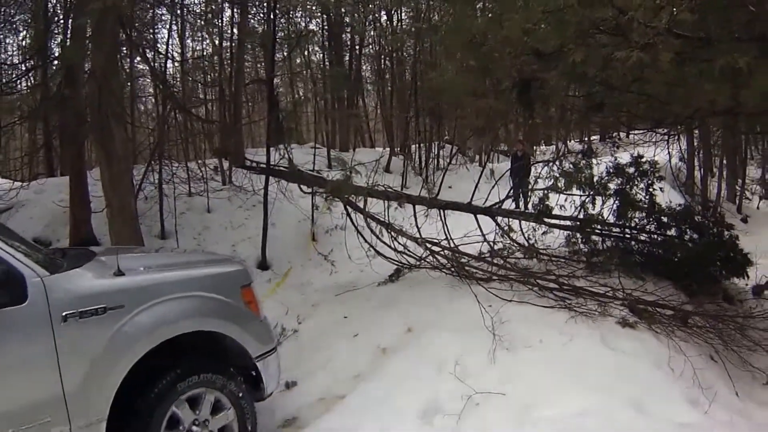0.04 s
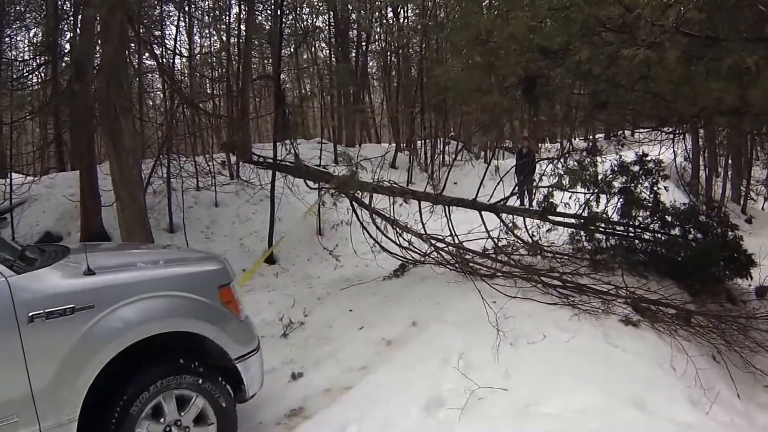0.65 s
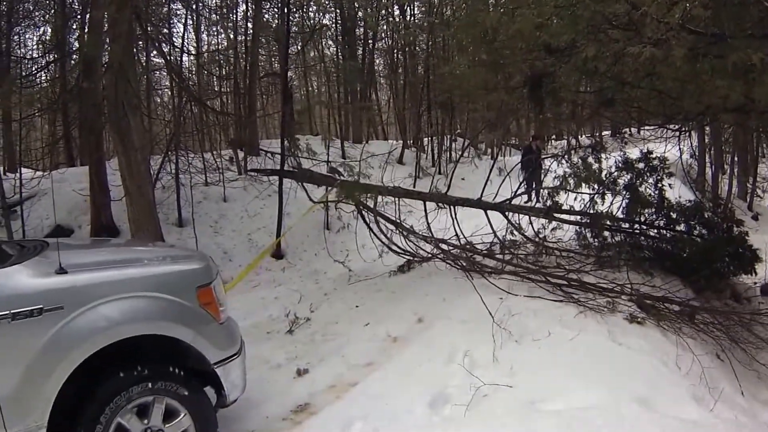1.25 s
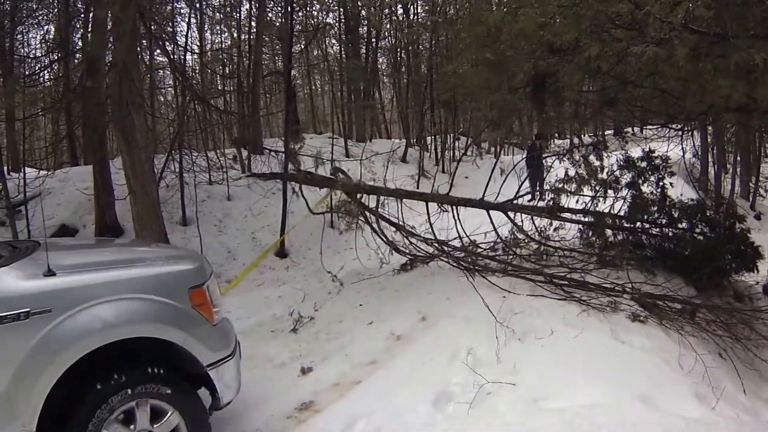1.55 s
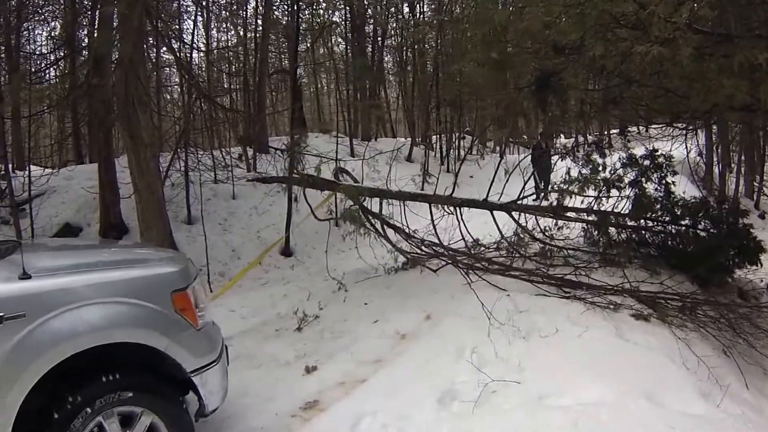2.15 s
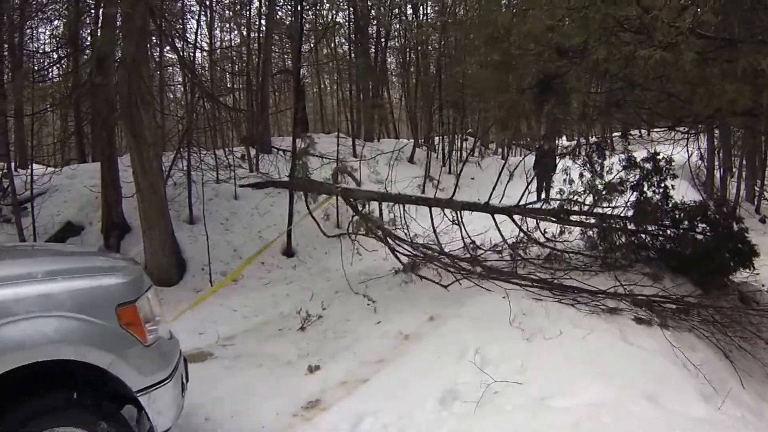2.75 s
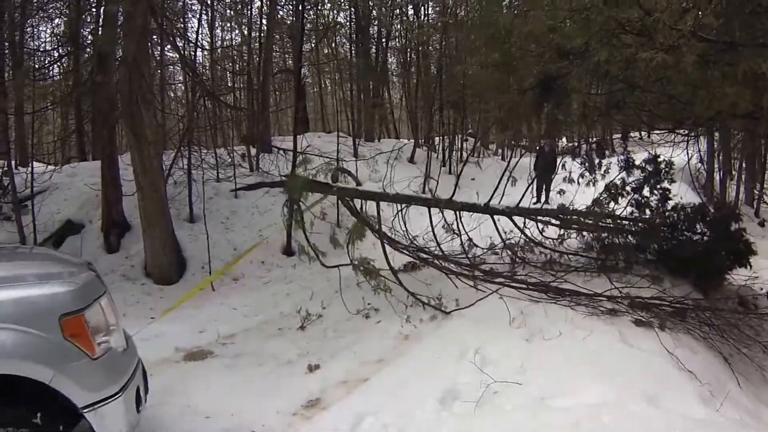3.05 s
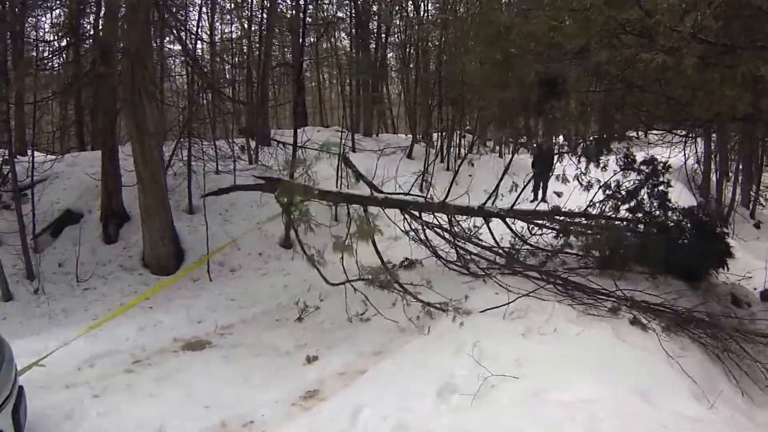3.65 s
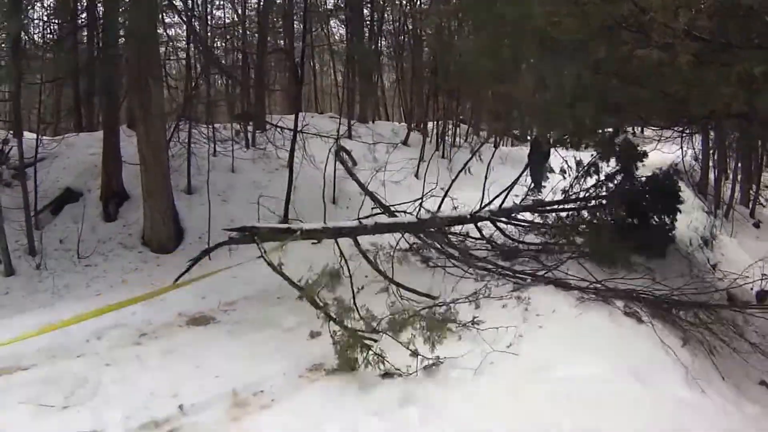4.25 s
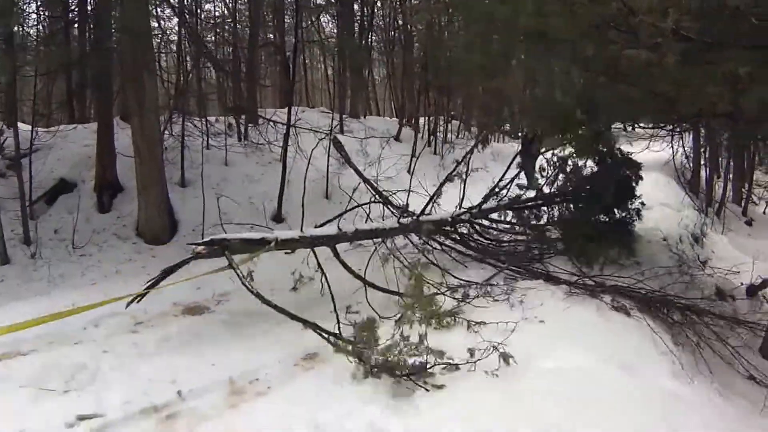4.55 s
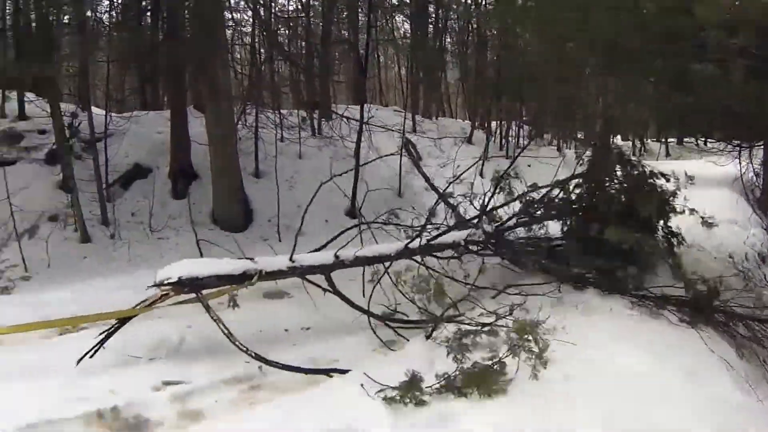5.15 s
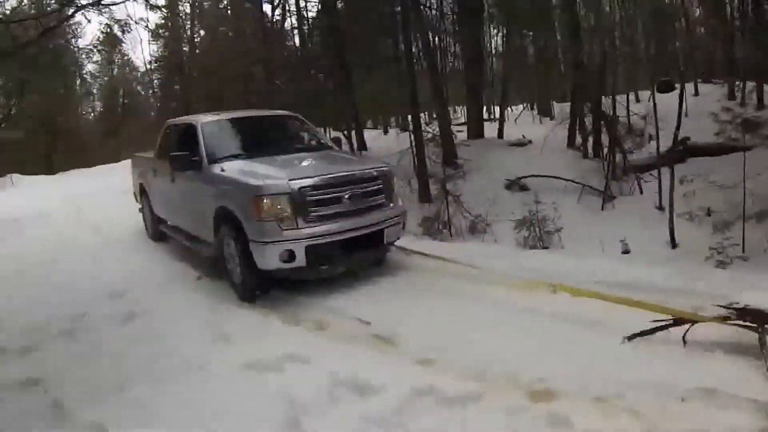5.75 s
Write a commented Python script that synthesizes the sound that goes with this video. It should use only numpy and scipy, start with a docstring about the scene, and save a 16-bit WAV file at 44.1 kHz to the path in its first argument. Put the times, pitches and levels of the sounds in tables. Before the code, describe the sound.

In snowy woods, light wind buffets a small microphone over a low truck engine and dull tyre thuds. The engine picks up and the snow crunches louder as a fallen tree is dragged along. Past halfway, a branch snaps hard enough to overload the microphone, then another, each with a short echo and splintering crackle. The engine drops back while twigs scrape and lighter branches keep cracking.

```python
"""An engine burbles and tyres crunch and thud: a pickup creeps backwards over packed snow,
towing a fallen tree out of the woods on a strap. Bent branches snap one after another, and the
trunks around scatter every crack. Twigs sweep the snow. Light wind rumbles on a small microphone
that the loudest snaps overload."""
import sys
import numpy as np
from scipy import signal
from scipy.fft import rfft, irfft, next_fast_len
from scipy.io import wavfile
from scipy.ndimage import uniform_filter1d

SR = 44100
rng = np.random.default_rng(int(sys.argv[2]) if len(sys.argv) > 2 else 0)


def put_to_file(sound):
    """Save the sound as 16-bit audio at rate SR, in the file named by the first command-line argument."""
    columns = np.atleast_2d(sound).T  # one column per channel
    safe = np.clip(columns, -1, 1)
    whole_steps = np.round(safe * 32767)
    wavfile.write(sys.argv[1], SR, whole_steps.astype(np.int16))


N = 260631
TIME = np.arange(N) / SR


# Breaking branches. Each row: start in seconds, level in dB, ring pitch in Hz, splinter hiss in
# relative dB. snap() trims each part from these levels.
BRANCH_SNAPS = [(0.4407, -56.5, 4110, 10), (1.2873, -42.5, 3460, -4.5), (1.66, -42.5, 4260, 4.5),
                (2.0107, -36, 3726, 1.5), (2.642, -47.5, 3900, 11), (2.7356, -43, 4780, 2),
                (3.1393, -49.5, 5680, 11.5), (3.2967, -7, 2997, -9), (3.3248, -24, 3450, -6),
                (3.357, -27.5, 3970, -4), (3.3817, -24, 3060, -6), (3.385, -24.5, 3220, -8),
                (3.491, -25, 4870, -3), (3.532, -34.5, 4350, 1), (3.5542, -31, 5100, 1),
                (3.56, -46, 5490, 16), (4.01, -42, 3760, 11), (4.06, -37.5, 3730, 8),
                (4.2029, -24.5, 3680, 4), (4.2466, -3, 3337, -7.5), (4.2747, -19, 4560, -4),
                (4.3505, -11.5, 4180, -7), (4.5412, -17, 3320, -1), (4.8205, -29.5, 3860, 1),
                (4.8246, -27.5, 2910, -6), (4.8473, -31, 3180, 2), (4.8643, -36, 4050, 6),
                (4.9216, -37, 4540, 1), (4.9346, -33.5, 3450, 1), (4.9403, -33.5, 3900, -3),
                (4.98, -31.5, 3230, -6), (5.0138, -19.5, 3000, -6.5), (5.0363, -41, 3950, 11),
                (5.1494, -30.5, 3470, 1), (5.2172, -29.5, 4840, -4), (5.324, -29, 4480, -2),
                (5.3506, -46, 4710, 13.5), (5.4186, -26.5, 4600, 1), (5.4322, -34, 5630, -2),
                (5.4663, -18, 1996, -5), (5.5366, -35.5, 3100, 0.5), (5.6544, -38.5, 5390, 4.5),
                (5.7105, -36, 3580, 6.5), (5.836, -35.5, 2510, -5)]

def branches():
    """Branches give way in turn: strong ones tear for longer, thick low ones jolt their limb harder."""
    out = np.zeros(N)
    for start_s, db, ring_hz, hiss_db in BRANCH_SNAPS:
        tear_s = 0.002 * 2 ** ((db + 30) / 46)
        knock_db = -10 - np.log2(ring_hz / 3500)
        echo_db = -14 - 2 * start_s  # the tree nears, so its cracks grow drier
        add(out, start_s, snap(db, ring_hz, knock_db, hiss_db, tear_s, echo_db))
    return out


# Branch modes. Each row: multiple of the ring pitch, width as a share of frequency, level in dB.
BRANCH_MODES = [(0.52, 0.17, -4), (0.69, 0.26, -4.5), (0.98, 0.23, 2.5), (1.39, 0.17, -3),
                (1.85, 0.24, -5.5)]
# Modes of the limb behind it. Each row: frequency in Hz, width as a share of it, level in dB.
LIMB_MODES = [(302, 2.1, -4.5), (601, 0.49, 2), (967, 0.19, 2)]

def snap(db, ring_hz, knock_db, hiss_db, tear_s, echo_db, recoil=22):
    """The tear rings the branch, knocks the limb and hisses; each trunk throws back a small echo."""
    t = np.arange(SR * 3 // 5) / SR
    # row 0: direct tear; row 1: swarm of echoes
    clicks = np.array([tear(t, tear_s, first_click=7), grains(len(t), per_s=3500)])
    ring = modes(clicks, BRANCH_MODES, ring_hz)
    # echoes leave from every side of the branch, blurring its modes into a broad band
    ring[1] += resonate(grains(len(t), per_s=3000), hz=3400, width_share=1.94)
    ring = cut(cut(ring, 1020, "high", order=3), 6740, "low")
    clicks[0, SR // 1000] += recoil  # the limb springs back 1 ms into the tear
    knock = cut(modes(clicks, LIMB_MODES), 2550, "low")
    fine_clicks = np.array([tear(t, tear_s, first_click=7.3), grains(len(t), per_s=3200)])
    splinters = cut(cut(fine_clicks, 4900, "high"), 12500, "low", order=1)
    parts = [(ring, 1, -1, 0.66), (knock, knock_db, -3.5, 0.7), (splinters, hiss_db + 0.6, -0.2, 0.62)]
    out = np.zeros(len(t))
    for (direct, swarm), part_db, echo_trim_db, t60_s in parts:
        echoes = undb(db + echo_db + echo_trim_db) * unit(swarm) * trunk_echo_envelope(t, t60_s)
        out += undb(part_db) * (set_burst_level(direct, db) + echoes)
    return out


def tear(t, tear_s, first_click, rattle_db=-19, rattle_s=0.0024):
    """One fibre bundle fails, the rest follow in an avalanche, and loose splinters rattle after it."""
    avalanche = np.exp(-(t / tear_s) ** 0.66)
    rattle = undb(rattle_db) * np.exp(-t / rattle_s)
    fibres = unit(grains(len(t), per_s=12000, spread_db=0)) * (avalanche + rattle)
    fibres[0] = first_click
    return fibres + 1e-18


def modes(x, table, scale=1):
    """Heavily damped modes of wood, neighbours swinging in opposite directions."""
    return sum((-1) ** k * undb(db) * resonate(x, scale * frequency, width_share)
               for k, (frequency, width_share, db) in enumerate(table))


def trunk_echo_envelope(t, t60_s, rise_s=0.0018, near_db=3, near_s=0.019):
    """Close trunks answer first; snow soaks up the far echoes."""
    near = undb(near_db) * np.exp(-t / near_s)
    far = undb(-60 * t / t60_s)
    return (1 - np.exp(-t / rise_s)) * (far + near)


# The driver's throttle. Each row: time in seconds, crank speed in Hz.
CRANK_SPEED = [(0, 25.13), (0.8, 23.25), (1.25, 24.88), (1.78, 25.85), (2.4, 32.3), (2.7, 33.48),
               (2.95, 33.16), (3.33, 29.47), (3.76, 36.46), (4, 35.93), (4.3, 32.2), (4.72, 21.6),
               (5.15, 21.6), (5.52, 27.26), (5.9, 29.5)]
# Engine orders. Each row: multiple of crank speed, relative level in dB at the opening speed
# before the exhaust pipe, dB gained per octave of revs, flutter from 0 to 1.
ENGINE_ORDERS = [(1.5, -8.5, 0, 0.93), (2, -0.5, 3, 0.05), (2.5, -19.5, -4, 0.63), (3, -5, 3.5, 0.26),
                 (4, -16, 4, 0.63)]

def engine(gain_db=-34, pipe_hz=67.7, pipe_q=4, away_s=4.05, away_fade_s=0.24, away_db=-5.5):
    """Low orders boom as they cross the exhaust resonance and run steadier at higher revs."""
    crank_hz, = curves(CRANK_SPEED)
    wobble = (25 / crank_hz) ** 2
    crank_rad = 2 * np.pi * np.cumsum(crank_hz) / SR + 0.037 * wobble * drift(25)
    revs_octaves = np.log2(crank_hz / crank_hz[0])
    tone = 0
    for order, db, db_per_octave, flutter in ENGINE_ORDERS:
        ratio = order * crank_hz / pipe_hz
        pipe_gain = 1 / np.hypot(1, pipe_q * (ratio - 1 / ratio))
        uneven = 1 + flutter * wobble * drift(13)
        tone += pipe_gain * undb(db + db_per_octave * revs_octaves) * uneven * np.sin(order * crank_rad)
    away = (1 + np.tanh((TIME - away_s) / away_fade_s)) / 2  # the truck backs past the microphone
    return np.sqrt(2) * undb(gain_db + away_db * away) * tone


# Low bumps of packing snow, a wind buffet and a few woody knocks.
# Each row: start in seconds, peak level in dB, pitch in Hz.
DULL_THUDS = [(0.089, -27.5, 62), (0.303, -21, 137), (0.367, -32, 125), (0.896, -22.5, 136),
              (1.135, -33, 150), (1.609, -29.5, 146), (2.163, -32.5, 206.6), (2.361, -22.5, 148),
              (2.976, -23, 267), (3.744, -18, 139), (4.117, -19, 145.8), (4.477, -24, 173.5),
              (4.605, -22, 195.4), (4.752, -25, 242), (4.983, -27, 300), (5.484, -24, 655),
              (5.536, -35, 480), (5.704, -26.5, 380), (5.827, -27.5, 163)]

def thuds(swell_cycles=0.48, grit_s=0.0073):
    """Each thud is a push of air about one cycle long, with a little grit."""
    out = np.zeros(N)
    t = np.arange(SR // 10) / SR
    for start_s, db, hz in DULL_THUDS:
        cycles = (t - 0.0145) * hz
        push = np.cos(2 * np.pi * cycles) * np.exp(-(cycles / swell_cycles) ** 2)
        grit_band = cut(cut(rng.standard_normal(len(t)), 750, "low", order=3), 250, "high")
        grit = unit(grit_band) * np.exp(-np.abs(t - 0.014) / grit_s)
        grit_db = np.interp(hz, [150, 260], [-23.5, -15.5])  # hard, high thuds carry more grit
        add(out, start_s - 0.01, undb(db) * (push + undb(grit_db) * grit))
    return out


# The haul gathers speed, then eases. Each row: time in seconds, tyre crunch in dB, twig scrape
# in dB, both before trim_db.
HAUL_LEVELS = [(0, -51.5, -60), (1.4, -53, -58), (2.2, -49.5, -54.5), (2.7, -47.5, -49.5),
               (3.05, -43.5, -52), (3.45, -40, -47.5), (3.95, -39, -43), (4.72, -40, -42), (5.3, -45, -42),
               (5.9, -44.5, -45)]
# Packing snow. Each row: frequency in Hz, relative spectral density in dB.
CRUNCH_SPECTRUM = [(60, -3), (110, 2), (200, -1.5), (330, -4.5), (480, -7.5), (700, -11), (1000, -17.5),
                   (1500, -24.5), (3000, -40), (8000, -55)]

def tyres(trim_db=1.5):
    """Snow packs under the treads in many small, uneven collapses."""
    crunch_db, _ = curves(HAUL_LEVELS)
    collapses = unit(grains(N, per_s=1300)) + 0.74 * rng.standard_normal(N)
    return colour(collapses * undb(2.23 * drift(60)), CRUNCH_SPECTRUM) * undb(crunch_db + trim_db)


# Twigs on snow. Each row: frequency in Hz, relative spectral density in dB.
SCRAPE_SPECTRUM = [(400, -5), (1000, 2), (1900, 1), (3100, 1.5), (4300, -1.5), (6000, 0), (8000, -3),
                   (11000, -3), (15000, -4)]

def twigs(trim_db=-1.5, waver_db=0.6, cluster_db=4):
    """Needles sweep the snow with a hiss; thin twigs tick as they catch and break when dragged hard."""
    _, scrape_db = curves(HAUL_LEVELS)
    sweep = colour(rng.standard_normal(N), SCRAPE_SPECTRUM) * undb(waver_db * drift(25))
    ticks = colour(grains(N, per_s=790) * undb(cluster_db * drift(18)), SCRAPE_SPECTRUM)
    drag = undb(0.65 * (scrape_db - scrape_db.max()))
    breaks = colour(grains(N, per_s=27, spread_db=2), SCRAPE_SPECTRUM) * drag
    return (sweep + undb(-4) * ticks + undb(-13) * breaks) * undb(scrape_db + trim_db)


# Wind rumble. Each row: frequency in Hz, relative spectral density in dB.
WIND_SPECTRUM = [(12, -33), (25, 0), (42, -4), (70, -2), (110, -19.5), (200, -22.5), (500, -61)]

def wind(start_db=-41, db_per_s=-1.16):
    """Eddies of a slowly dropping breeze buffet the microphone."""
    rumble = colour(rng.standard_normal(N), WIND_SPECTRUM)
    return rumble * undb(start_db + db_per_s * TIME + 1.1 * drift(12))


# Engine fan. Each row: frequency in Hz, relative spectral density in dB.
FAN_SPECTRUM = [(150, 4), (300, 0), (800, -5.5), (1300, -7), (1900, -8.5), (2900, -12.5), (3300, -8.5),
                (3700, -15), (4300, -13.5), (4800, -10.5), (6500, -23), (15000, -40)]

def fan(level_db=-56.5):
    """The fan hisses behind the engine, wavering slightly."""
    return colour(rng.standard_normal(N), FAN_SPECTRUM) * undb(level_db + 0.31 * drift(7.14))


def undb(db):
    """Decibels to gain."""
    return 10 ** (np.asarray(db) / 20)


def unit(x):
    """Scale to rms 1."""
    return x / np.sqrt(np.mean(x ** 2) + 1e-18)


def curves(table):
    """A timed table's columns at every sample."""
    times_s, *columns = np.transpose(table)
    return [np.interp(TIME, times_s, column) for column in columns]


def drift(rate_hz):
    """Smooth random drift with a spread near 1."""
    hold = int(SR / rate_hz)
    steps = np.repeat(rng.standard_normal(N // hold + 1), hold)
    return 1.68 * uniform_filter1d(uniform_filter1d(steps, hold), hold)[:N]


def colour(x, spectrum):
    """Shape x by (Hz, dB) points, rolled off below the first, at rms 1."""
    hz, db = np.transpose(spectrum)
    size = next_fast_len(len(x))
    bin_hz = np.maximum(np.fft.rfftfreq(size, 1 / SR), 1)
    gain = undb(np.interp(np.log(bin_hz), np.log(hz), db)) * np.minimum(bin_hz / hz[0], 1) ** 2
    return unit(irfft(rfft(x, size) * gain, size)[:len(x)])


def resonate(x, hz, width_share):
    """One damped resonance, its width a share of its frequency."""
    return signal.lfilter(*signal.iirpeak(hz, 1 / width_share, fs=SR), x)


def cut(x, hz, kind, order=2):
    """Low-pass or high-pass."""
    return signal.sosfilt(signal.butter(order, hz, kind, fs=SR, output="sos"), x)


def grains(samples, per_s, spread_db=3):
    """Random tiny clicks: many weak, a few strong."""
    sizes = undb(spread_db * np.minimum(rng.exponential(size=samples), 5))
    return (rng.random(samples) < per_s / SR) * rng.choice([-1, 1], samples) * sizes


def add(track, start_s, sound):
    """Mix a sound into the track."""
    i = int(start_s * SR)
    track[i:i + len(sound)] += sound[:len(track) - i]


def set_burst_level(x, db):
    """Set the rms level of the loudest 3 ms."""
    return x * undb(db) / np.sqrt(uniform_filter1d(x ** 2, size=132, mode="constant").max())


def scene():
    """Truck, wind, snow and tree at one microphone."""
    return (engine() + fan() + wind() + tyres() + thuds() + twigs() + branches())[None]


def record(dry):
    """The loudest snaps overload the input; treble above 15.5 kHz is cut."""
    clipped = np.clip(dry, -1, 1)
    return signal.sosfilt(signal.ellip(8, 0.2, 70, 15500, fs=SR, output="sos"), clipped)


dry = scene()
out = record(dry)
put_to_file(out)
```